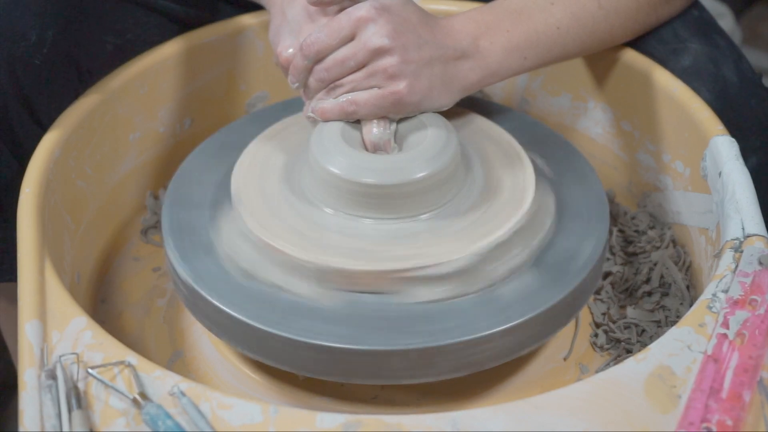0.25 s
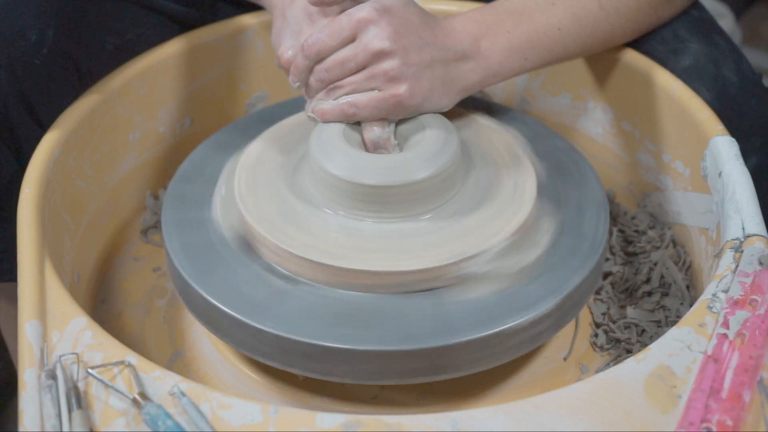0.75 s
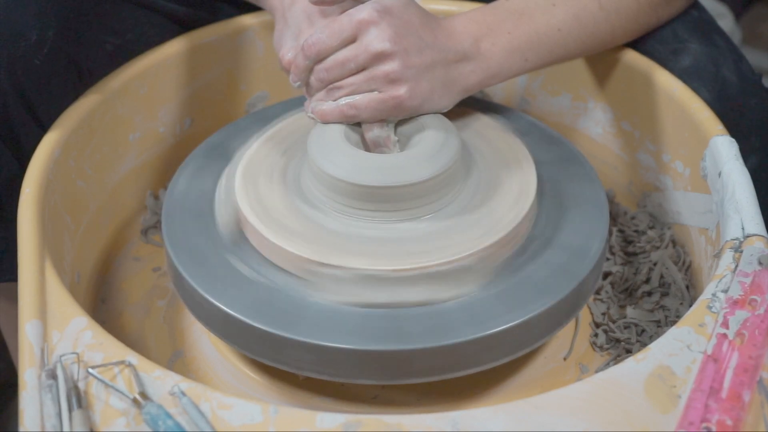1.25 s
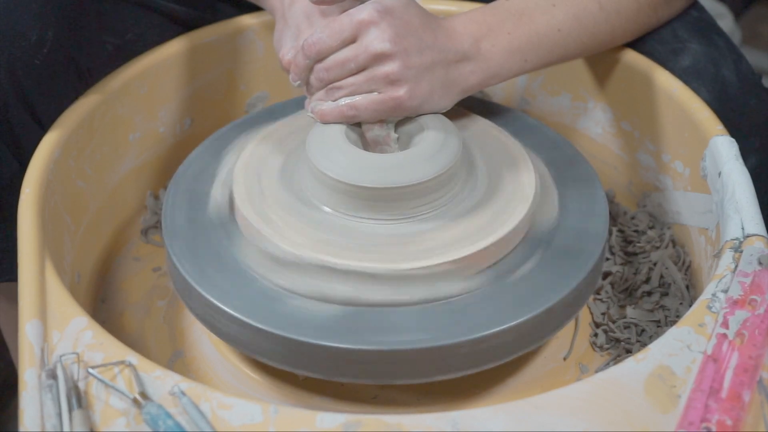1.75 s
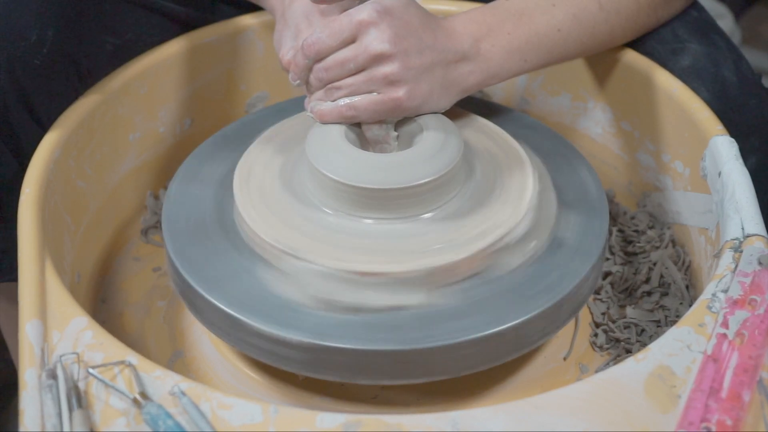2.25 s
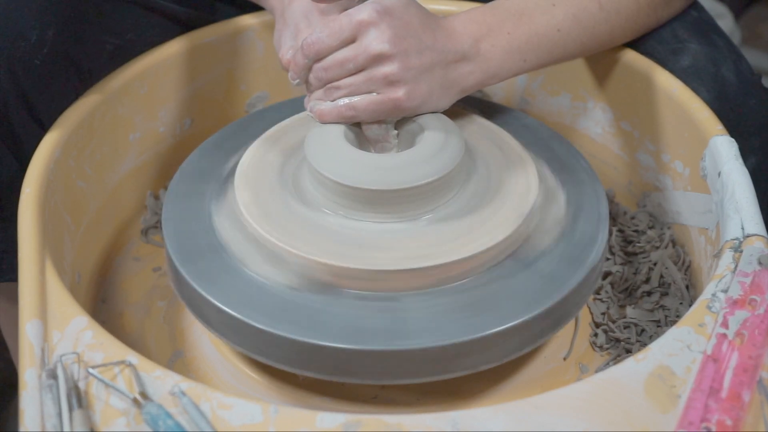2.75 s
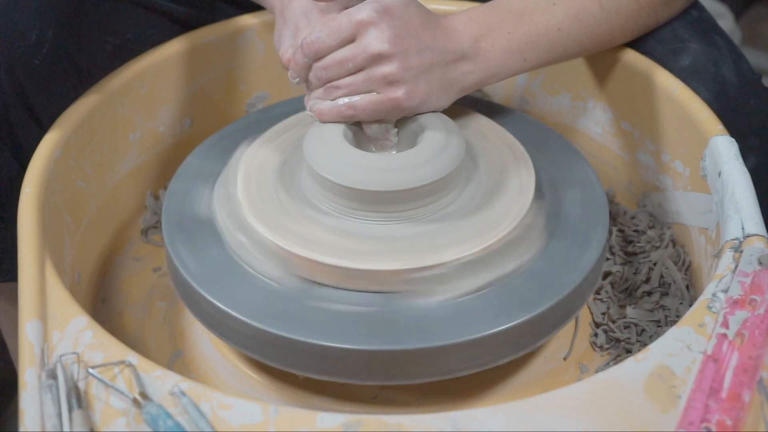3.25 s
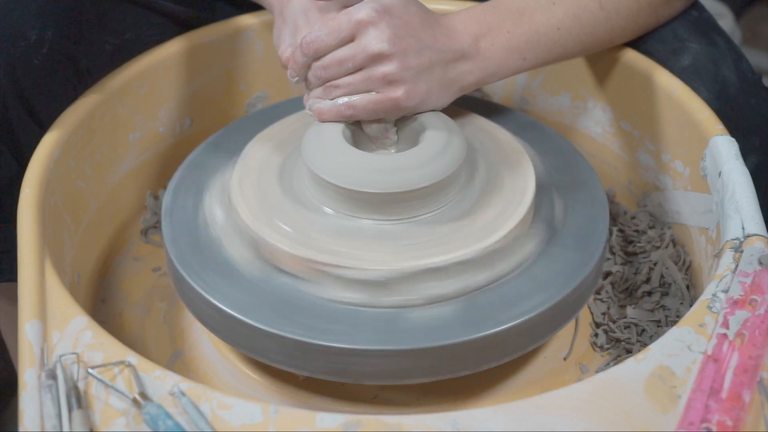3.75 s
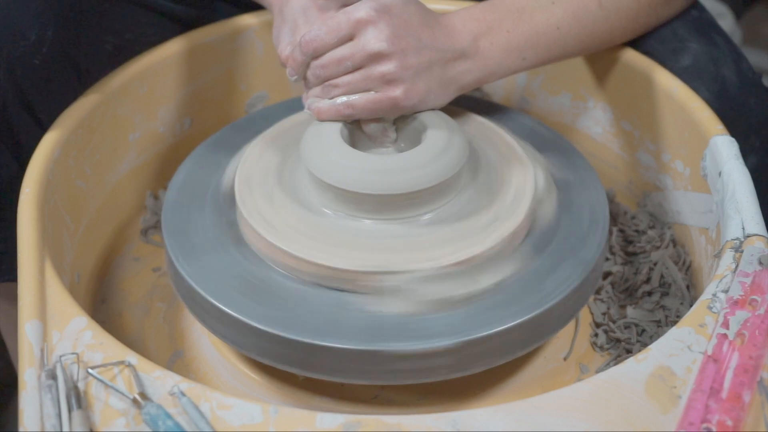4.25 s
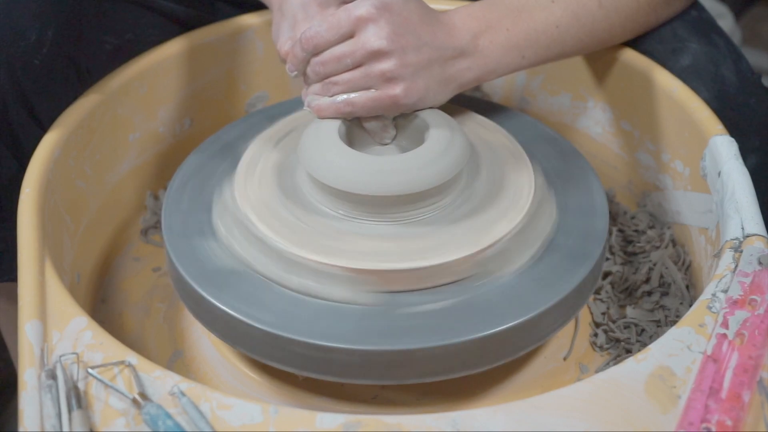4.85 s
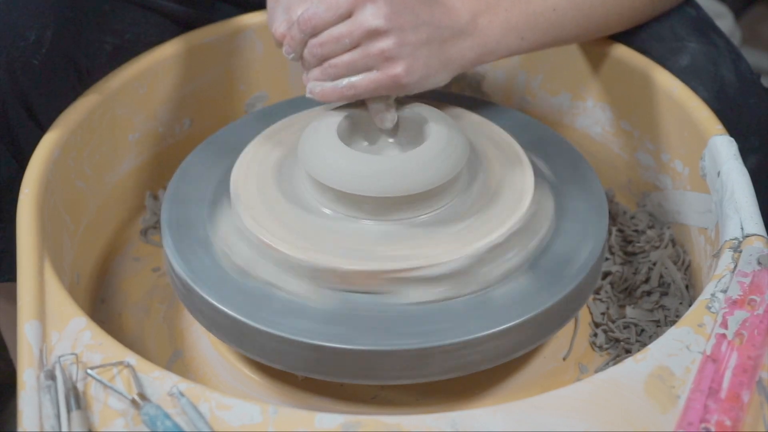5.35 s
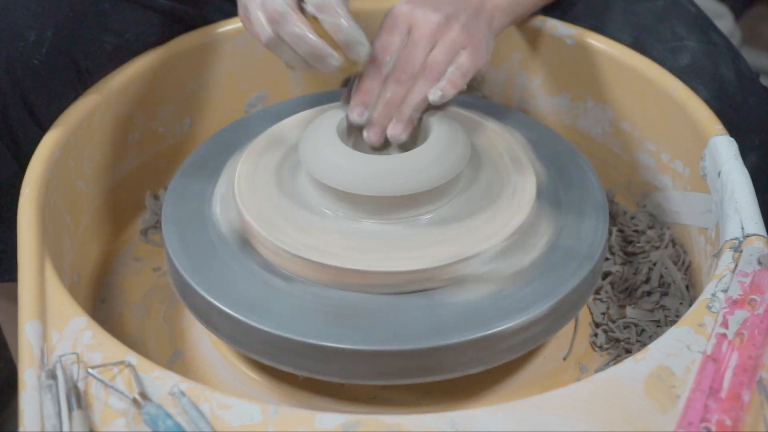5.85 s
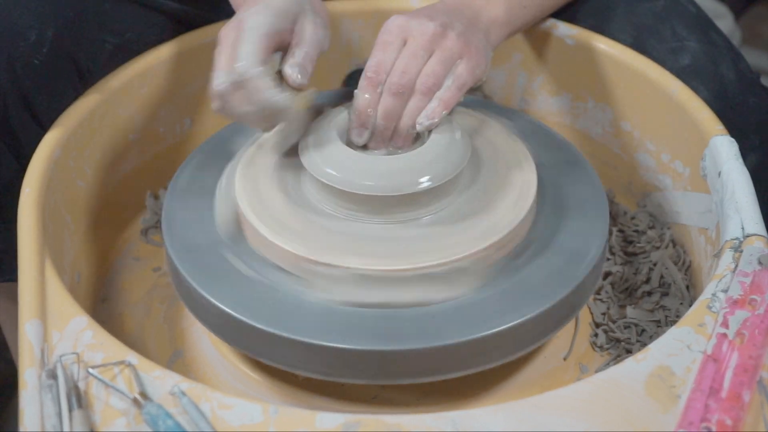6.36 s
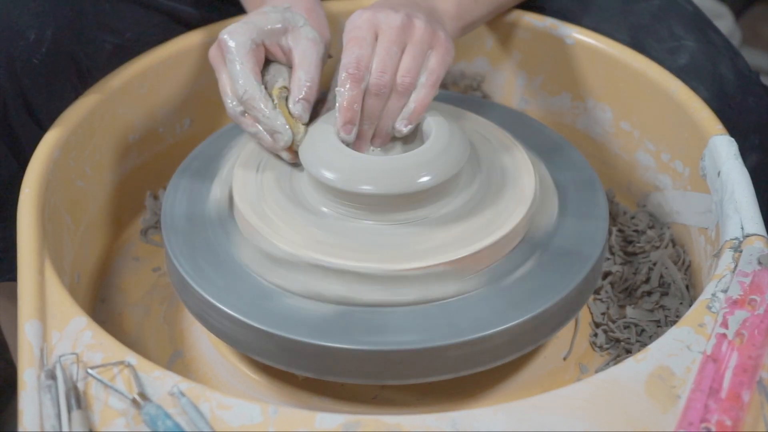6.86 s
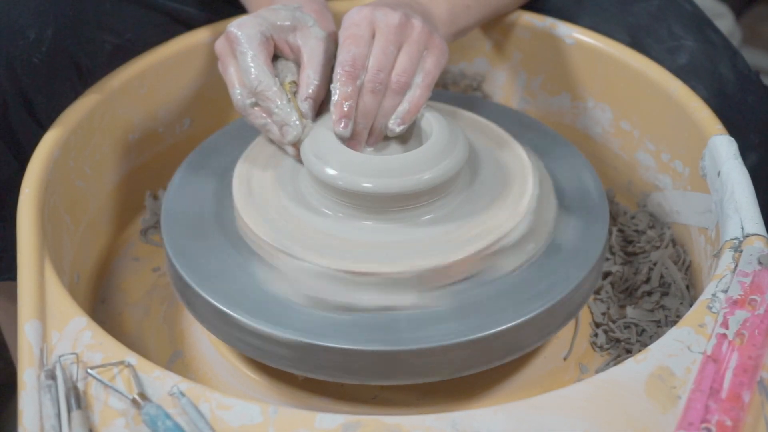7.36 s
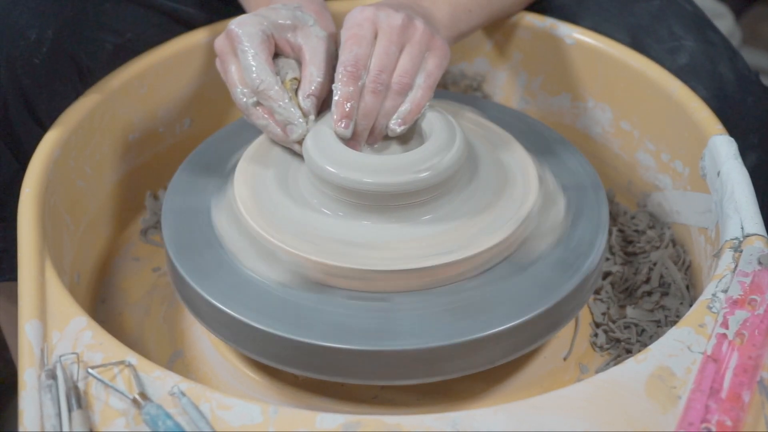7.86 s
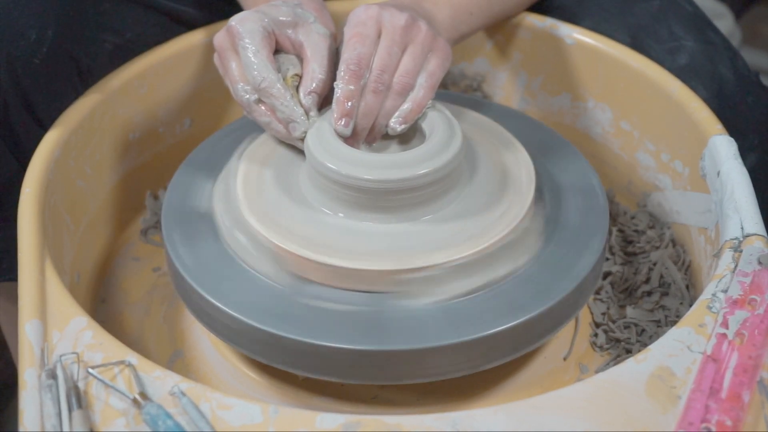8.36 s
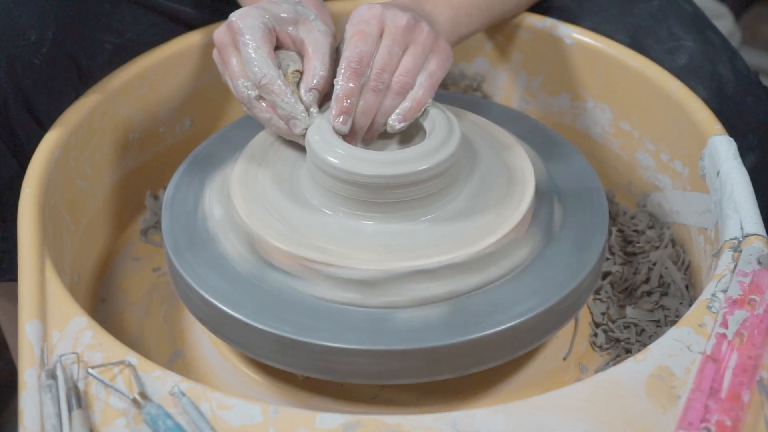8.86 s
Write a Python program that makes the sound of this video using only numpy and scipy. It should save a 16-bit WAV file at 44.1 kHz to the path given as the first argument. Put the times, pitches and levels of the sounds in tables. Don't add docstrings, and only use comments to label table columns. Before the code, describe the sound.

Close recording in a quiet pottery studio: steady droning whir of an electric wheel, low and slightly metallic, pulsing quickly with each motor turn, over mains hum and airy friction hiss. One tiny drop ticks early; near the middle, delicate wet squeezes of sponge and slip and several bright drips appear. The drone then carries on unchanged to the end.

```python
import sys
import numpy as np
from scipy import signal
from scipy.fft import rfft, irfft
from scipy.io import wavfile
from scipy.ndimage import uniform_filter1d

SR = 44100
rng = np.random.default_rng(int(sys.argv[2]) if len(sys.argv) > 2 else 0)


def bounce(signal):
    frames = np.transpose(np.atleast_2d(signal))
    limited = np.clip(frames, -1, 1)
    pcm = np.round(limited * 32767).astype(np.int16)
    wavfile.write(sys.argv[1], SR, pcm)


def gain_from_decibels(decibels):
    exponent = np.asarray(decibels, float) / 20
    return 10 ** exponent


N = 401310

SHAFT_HZ = 10.5446
# (time [s], share [0-1])
LEAN = [
    (0, 0),
    (4.2, 0),
    (4.8, 1),
    (6.2, 1),
    (6.42, .2),
    (6.65, 1),
    (9.1, 1),
]


def evened(x):
    return x / np.sqrt(np.mean(x ** 2) + 1e-20)


def read(points, at):
    return np.interp(at, *np.transpose(points))


def coloured(x, gain):
    return irfft(rfft(x, N) * gain(np.fft.rfftfreq(N, 1 / SR)), N)


def on_log(points):
    f, db = np.transpose(points)
    return lambda hz: gain_from_decibels(np.interp(np.log(hz + 1), np.log(f + 1), db))


def angles():
    # (time [s], lead [turns])
    lead = [(0, -.0155), (1.2, -.001), (2.7, .0046), (4.9, -.0051), (5.6, -.0024), (7, .0096), (7.7, .0039),
            (9.1, -.0137)]
    wheel_hz, wheel_start_s, wobble_turns = 2.555, .035, .0034
    t = np.arange(N) / SR
    wheel = 2 * np.pi * wheel_hz * (t - wheel_start_s)
    turns = SHAFT_HZ * t + read(lead, t) - wobble_turns * np.sin(wheel)
    return turns, wheel


def orders(count=300):
    # (multiple, level [dB rms])
    strong_orders = [(5, -58.9), (7, -64.6), (8, -53.0), (9, -46.2), (10, -52.9), (12, -48), (13, -47.9),
                     (14, -36.4), (15, -31.2), (16, -48.2), (17, -42.8), (18, -35.7), (19, -30.2),
                     (20, -37.9), (21, -51.2), (22, -42.2), (24, -56.0), (27, -53.7), (28, -43.2),
                     (29, -39.6), (31, -41.5), (32, -42.4), (33, -47.4), (34, -55.1), (36, -54.0),
                     (38, -42.3), (40, -51.3), (41, -52.4),
                     (46, -45.6), (51, -41.9), (53, -46.5), (54, -49.3), (55, -45.1), (59, -48.3), (61, -45.8),
                  (62, -44.7), (64, -41.7), (65, -50.2), (68, -39.5), (69, -44.1), (70, -41.5), (72, -50.0),
                  (74, -40.3), (75, -48.2), (77, -49.7), (78, -49.1), (81, -47.4), (82, -45.3), (83, -41.3),
                  (84, -45.8), (87, -49.0), (88, -39.2), (89, -45.5), (91, -46.1), (102, -48.2),
                  (108, -50.2), (109, -39.6), (112, -50.1),
                     (49, -52.9), (52, -51.3), (58, -52.6), (66, -47.8), (71, -51.3), (80, -51.0),
                   (96, -52.3), (106, -50.8), (114, -51), (115, -50.8), (118, -52), (122, -52),
                   (123, -52.0),
                     (136, -55.3), (137, -51.7), (138, -58.6), (139, -54.2), (141, -62.7), (142, -57.7),
                    (149, -62.4), (158, -58.3), (161, -59.0), (166, -62.9), (181, -63.4), (182, -63.2),
                    (234, -59.8), (236, -54.6)]
    # (multiple, level [dB rms])
    weak_orders = [(46, -63), (95, -56.5), (125, -63.5), (135, -59), (155, -70), (185, -69), (215, -68.5),
                   (245, -70)]
    strike = [(0, -.158, 0), (14, -.0175, 0), (16, .33, 0), (18, -.105, 0), (20, -.047, 0), (27, .053, 0),
              (31, -.282, 0), (33, 0, 0), (39, .02, 1.5), (85, .06, 1.2), (125, .05, 2.2), (230, .03, 1.2),
              (246, .03, 3)]
    k = np.arange(count)
    weak_db = read(weak_orders, k) - 0.12 * np.maximum(k - 255, 0)
    size = gain_from_decibels(weak_db) * np.sqrt(rng.exponential(1, count)) * (k > 45)
    for multiple, db in strong_orders:
        size[round(multiple)] = gain_from_decibels(db)
    lowest, moment, scatter = np.transpose(strike)
    part = np.searchsorted(lowest, k, side="right") - 1
    phase = scatter[part] * rng.standard_normal(count) - 2 * np.pi * k * moment[part]
    return np.sqrt(2) * size * np.exp(1j * phase)


def played(strength, turns, size=16384):
    turn = irfft(strength, size) * size / 2
    return np.interp(turns % 1 * size, np.arange(size + 1), np.append(turn, turn[0]))


def random_phasors(count):
    return rng.standard_normal(count) + 1j * rng.standard_normal(count)


def motor(throb=0.31, swell=0.015):
    # (centre [multiple], width [multiples], change [dB])
    lean_db = [(9, .5, 5), (12, .5, 14), (14, .5, 3), (31, 2.5, -2.5), (36, .5, 5), (59.5, 1, 6),
               (68, 6, -3.5), (78.4, 1, 6.5), (82, .5, 3), (89, .8, 5), (106, .5, 5), (112, .5, 4)]
    # (multiple, side, level [dB rms], wheel angle of swell [rad])
    swells = [(14, 1, -42.5, -3.25), (14, -1, -50, -2.8), (19, -1, -39, .85), (19, 1, -46, .35),
              (88, -1, -47.5, 1.), (89, -1, -46, -.2), (109, 1, -53, 1.7)]
    turns, wheel = angles()
    strength = orders()
    k = np.arange(len(strength))

    change_db = sum(db * np.exp(-((k - centre) / width) ** 2) for centre, width, db in lean_db)
    upright = played(strength * gain_from_decibels(-.5 * change_db), turns)
    leaning = played(strength * gain_from_decibels(.5 * change_db), turns)
    lean = read(LEAN, np.arange(N) / SR)
    sound = (upright + lean * (leaning - upright)) * (1 + swell * np.cos(wheel - .8))

    sway = gain_from_decibels(np.interp(k, [20, 50, 100], [-24, -15, -12]))
    sound += played(strength * sway * random_phasors(len(k)), turns) * np.cos(wheel)
    sound += played(strength * sway * random_phasors(len(k)), turns) * np.sin(wheel)
    for multiple, side, db, at in swells:
        phase = 2 * np.pi * multiple * turns + np.angle(strength[multiple]) + side * (wheel - at)
        sound += np.sqrt(2) * gain_from_decibels(db) * np.cos(phase)

    flutter_db = np.interp(k, [20, 50, 100, 200], [-19, -16, -13.5, -8.5])
    skirt = abs(strength) * gain_from_decibels(flutter_db) * np.sqrt(SR / SHAFT_HZ) / 2
    flutter = coloured(rng.standard_normal(N), lambda hz: np.interp(hz, k * SHAFT_HZ, skirt, right=0))
    return sound + flutter * (1 + throb * np.cos(2 * np.pi * (turns - .03)))


def hiss(shell_db=-72.0, throb=0.02, ripple_db=3.0):
    # (frequency [Hz], density [dB per Hz])
    broad = [(20, -86), (50, -70.5), (270, -71), (600, -62.5), (1400, -75.5), (2150, -81.5), (3300, -86.5),
             (11000, -92)]
    # (frequency [Hz], width [Hz], level [dB])
    shell = [(1697, 17, -28), (2180, 37, -23), (2350, 480, -29), (3576, 76, -7.5), (4060, 420, -8.5),
             (4494, 310, -6), (5810, 880, -11), (6300, 2100, -14.5)]

    def gain(hz):
        rings = sum(gain_from_decibels(2 * (db + shell_db)) / (1 + (2 * (hz - f) / w) ** 2) ** 2 for f, w, db in shell)
        rough = uniform_filter1d(rng.standard_normal(len(hz)), size=200)
        ripple = evened(uniform_filter1d(rough, size=200))
        rippled = (hz > 1500) * (hz < 7000)
        density = on_log(broad)(hz) ** 2 + rings
        return np.sqrt(density * SR / 2) * gain_from_decibels(ripple_db * ripple * rippled)

    turns, _ = angles()
    return coloured(rng.standard_normal(N), gain) * (1 + throb * np.cos(2 * np.pi * turns))


def slow_noise():
    return evened(coloured(rng.standard_normal(N), lambda hz: 1 / (1 + (hz / 8) ** 2)))


def hum():
    # (frequency [Hz], level [dB rms])
    mains = [(29.97, -66), (59.97, -54), (119.89, -47)]
    whine_hz, whine_db = 5241, -58.6
    t = np.arange(N) / SR
    lines = sum(np.sqrt(2) * gain_from_decibels(db) * np.cos(2 * np.pi * (hz * t + rng.random())) for hz, db in mains)
    drift = slow_noise()
    flicker = slow_noise()
    phase = 2 * np.pi * np.cumsum(whine_hz + 4 * drift) / SR
    whine = np.cos(phase) * gain_from_decibels(whine_db + 2 * read(LEAN, t) + 1.5 * flicker)
    return lines + np.sqrt(2) * whine


def clay():
    # (time [s], peak [dB], time to fall 20 dB [s])
    slip = [
        (5.545, -46, 0),
        (5.6, -54, 2),
        (5.984, -55, .18),
        (6.268, -51, .13),
        (6.482, -59, .08),
        (6.612, -61, .09),
    ]
    # (time [s], peak [dB], pitch [Hz])
    drops = [
        (2.7816, -41, 6500),
        (5.693, -39, 7460),
        (5.9794, -42, 6840),
        (6.0087, -39.5, 6510),
        (6.035, -34, 8300),
        (6.2894, -42, 6640),
    ]
    rise_s = .05
    t = np.arange(N) / SR
    grains = rng.standard_normal(N) * gain_from_decibels(9 * uniform_filter1d(rng.exponential(1, N), 40))
    fizz = evened(coloured(grains, on_log([(2500, -30), (5000, 1), (8500, -2), (11000, -8)])))
    sound = fizz * sum(gain_from_decibels(db - 20 * np.maximum((s - t) / rise_s, (t - s) / fall)) for s, db, fall in slip)
    u = np.arange(600) / SR
    for s, db, hz in drops:
        decay = gain_from_decibels(db - 60 * u / 0.012)
        onset = np.minimum(u / .0008, 1)
        ring = np.sin(2 * np.pi * hz * u * (1 + 9.8 * u))
        sound[round(s * SR):][:len(u)] += decay * ring * onset
    return sound


def panels(x):
    # (frequency [Hz], width [Hz], lift [dB])
    modes = [(608, 5, 5), (652, 5, -1), (698, 5, -1), (957, 6, -10), (1071, 6, -4), (1207, 6, 2),
             (1253, 10, -6), (1282, 8, 3), (1640, 12, 9), (1672, 12, -3), (1972, 14, 7), (2296, 30, 2),
             (2478, 14, 2), (2540, 14, 14)]
    return coloured(x, lambda hz: 1 + sum(gain_from_decibels(db) / (1 + 2j * (hz - f) / w) for f, w, db in modes))


def room_side(x):
    # (frequency [Hz], level [dB])
    side_db = [(50, -11), (140, -20.5), (210, -24), (300, -18.5), (1050, -23.5), (1860, -18.5),
               (3290, -8.5), (10300, -4.5)]
    u = np.arange(SR // 2) / SR
    tail = rng.standard_normal(len(u)) * gain_from_decibels(-60 * u / .6) * (u > .03)
    echo = irfft(rfft(x) * rfft(tail / np.linalg.norm(tail), N), N)
    return coloured(echo, on_log(side_db))


def scene():
    mid = panels(motor() + hiss()) + hum() + clay()
    side = room_side(mid)
    return np.array([mid + side, mid - side])


def roll_off(x):
    return signal.sosfilt(signal.butter(12, 10930, fs=SR, output="sos"), x)


def record(dry):
    return roll_off(dry)


dry = scene()
out = record(dry)
bounce(out)
```